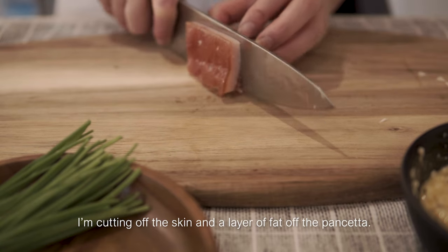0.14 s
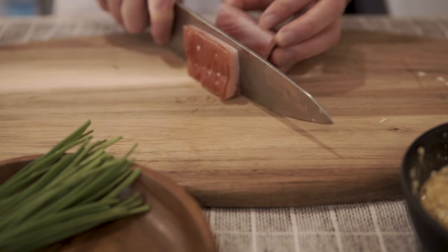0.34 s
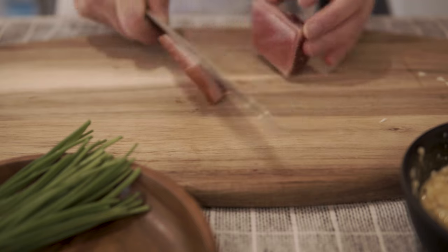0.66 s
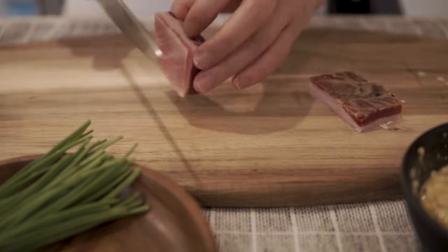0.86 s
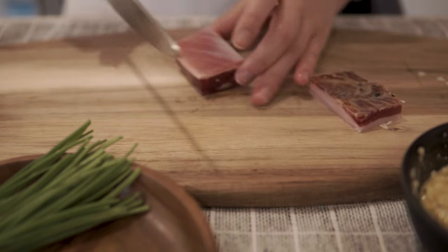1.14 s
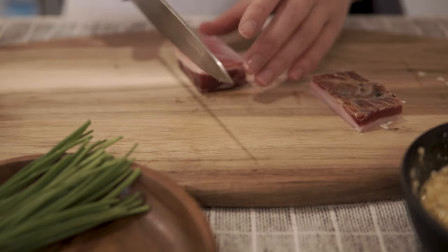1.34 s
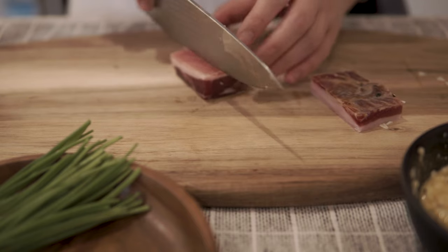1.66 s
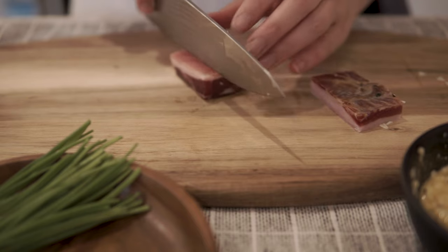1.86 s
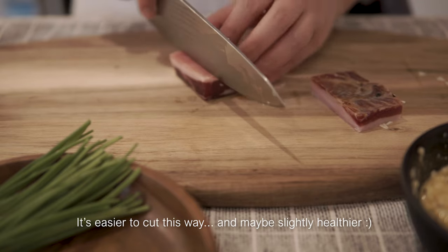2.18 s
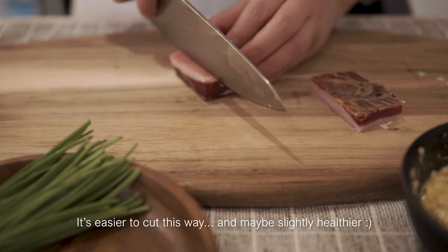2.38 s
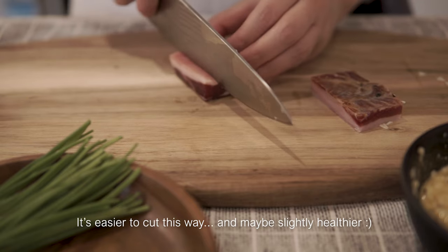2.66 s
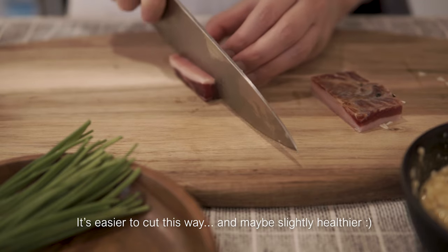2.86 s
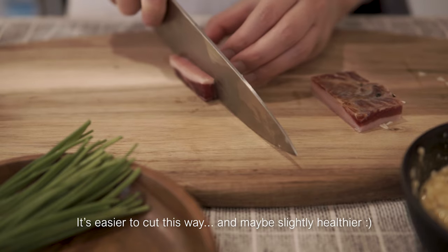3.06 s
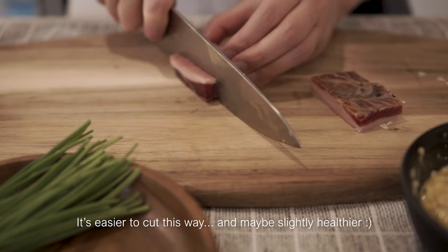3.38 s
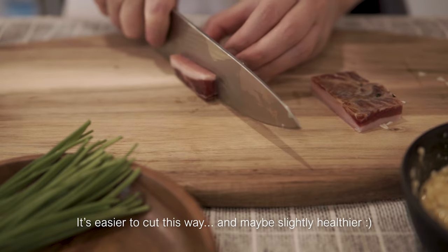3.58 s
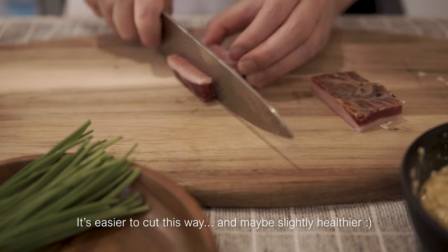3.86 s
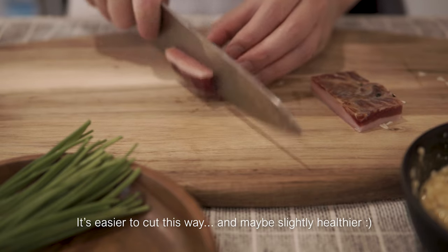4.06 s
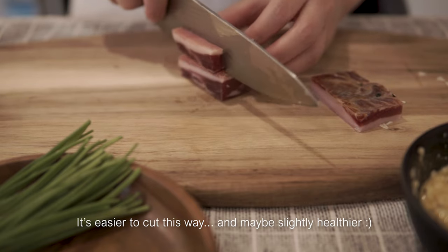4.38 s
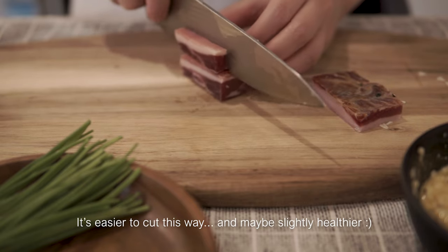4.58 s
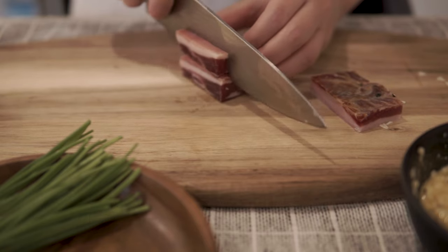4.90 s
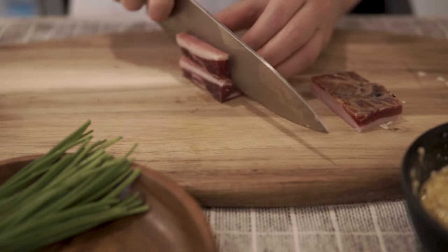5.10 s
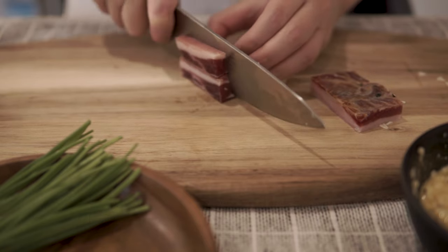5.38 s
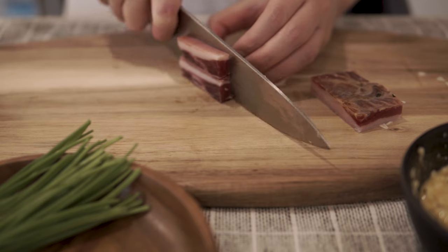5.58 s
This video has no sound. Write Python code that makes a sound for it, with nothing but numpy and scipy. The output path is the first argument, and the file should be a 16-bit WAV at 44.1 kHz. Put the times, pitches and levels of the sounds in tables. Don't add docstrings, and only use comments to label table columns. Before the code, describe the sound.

Close, dry sound of a knife on a thick wooden board in a small kitchen. Faint scrapes and ticks come first, then an abrupt scene change, a hollow slap of meat and a light chop. After a quiet gap, crunchy sawing with knocks and snaps builds to a hard ringing chop. Softer rasps follow, then another lull and a final burst of heavy chops and thumps over faint hiss.

```python
import sys
import numpy as np
from scipy import signal
from scipy.fft import rfft, irfft, next_fast_len
from scipy.io import wavfile

SR = 44100
rng = np.random.default_rng(int(sys.argv[2]) if len(sys.argv) > 2 else 0)


def gain_from_db(level_db):
    decades = np.asarray(level_db, float) / 20
    return 10 ** decades


def materialize(psi):
    bounded = np.clip(np.atleast_2d(psi).T, -1, 1)
    quanta = np.round(bounded * 32767).astype(np.int16)
    wavfile.write(sys.argv[1], SR, quanta)


N = 253134
SCENE_CHANGE_S = .761


def rms_one(x):
    return x / np.sqrt(np.mean(x ** 2) + 1e-20)


def at_hz(points, hz):
    table_hz, value = np.transpose(points)
    return np.interp(np.log(hz), np.log(table_hz), value)


def ring(force, hz, t60):
    r, w = gain_from_db(-60 / (t60 * SR)), 2 * np.pi * hz / SR
    return signal.lfilter([0, np.sin(w)], [1, -2 * r * np.cos(w), r * r], force + 1e-18)


def soften(x, cut_hz, kind="low", order=2):
    return signal.sosfilt(signal.butter(order, min(cut_hz, .45 * SR), kind, fs=SR, output="sos"), x)


def bandpass(x, low_hz, high_hz):
    return signal.sosfilt(signal.butter(2, [low_hz, high_hz], "band", fs=SR, output="sos"), x)


def coloured(spectrum):
    hz = np.maximum(np.fft.rfftfreq(N, 1 / SR), 1)
    return rms_one(irfft(rfft(rng.standard_normal(N)) * gain_from_db(at_hz(spectrum, hz)), N))


def swell(age, rise, fall):
    growing = np.sin(np.pi / 2 * np.clip(age / rise, 0, 1)) ** 2
    return np.where(age < rise, growing, np.exp((rise - age) / fall))


# f/Hz, level/dB [per Hz]
HISS_MID = [(75, -40), (110, -15), (150, -10.5), (180, -25), (210, -15), (330, -19), (480, -18.5),
            (700, -12.5), (1500, -18), (2600, -19.5), (10800, -22.5), (15500, -23.5), (16000, -29.5),
            (16600, -60.5)]
HISS_SIDE = [(12, -28), (20, -4), (94, -13.5), (194, -19), (271, -16), (349, -22.5), (563, -10.5),
             (1730, -13.5), (13400, -15.5), (16300, -21)]
HISS_DB, HISS_JUMP_DB, HISS_SETTLE_S = -72, 7.5, .25


def microphone_hiss():
    t = np.arange(N) / SR
    settling = np.exp(np.minimum(SCENE_CHANGE_S - t, 0) / HISS_SETTLE_S)
    level = gain_from_db(HISS_DB + HISS_JUMP_DB * (t >= SCENE_CHANGE_S) * settling)
    return level * coloured(HISS_MID), gain_from_db(-2) * level * coloured(HISS_SIDE)


# f/Hz, level/dB [rms]
HUM = [(24.2, -65.5), (48.4, -63.5), (72.6, -79), (96.8, -78), (145.2, -85.5)]
# t/s, f/Hz
WHINE = [(0, 12300), (.8, 12300), (.95, 11900), (1.05, 12250), (1.95, 12350), (2.06, 11800), (2.2, 12200),
         (2.45, 11800), (3.3, 12000), (3.85, 11950), (3.93, 11350), (4.15, 12000), (4.38, 12200),
         (4.45, 11700), (4.8, 12200), (4.9, 11850), (5.1, 12300), (5.74, 12050)]
WHINE_WANDER_HZ, WANDER_RATE_HZ = 70, 20


def machines():
    t = np.arange(N) / SR
    turn = 2 * np.pi * HUM[0][0] * t
    hum = sum(np.sqrt(2) * gain_from_db(db) * np.sin(2 * np.pi * hz * t + 6 * rng.random()) for hz, db in HUM)
    jitter = 110 * rms_one(soften(rng.standard_normal(N), 110))
    jitter += WHINE_WANDER_HZ * rms_one(soften(rng.standard_normal(N), WANDER_RATE_HZ))
    pitch = np.interp(t, *np.transpose(WHINE)) + jitter + 60 * np.sin(turn)
    whine = (1 + 0.42 * np.sin(turn)) * np.sin(2 * np.pi * np.cumsum(pitch) / SR)
    return hum + gain_from_db(-79) * whine


# f/Hz, t60/s
KITCHEN_T60 = [(150, 0.33), (500, 0.27), (1000, 0.2), (2500, 0.09), (6000, 0.15), (12000, 0.088)]
# f/Hz, level/dB
KITCHEN_LEVEL = [(150, 3), (600, 2.5), (1500, 2), (3000, 2.5), (6000, -16), (12000, -16.5)]


def walls_answer():
    t, out = np.arange(SR) / SR, 0
    white = rng.standard_normal((2, SR))
    edges = 120 * 2 ** np.arange(0, 7.1, .5)
    for k, (low, high) in enumerate(zip(edges, edges[1:])):
        band = bandpass(white[k % 2], low, high)
        hz = np.sqrt(low * high)
        out = out + band * gain_from_db(at_hz(KITCHEN_LEVEL, hz) - 60 * t / at_hz(KITCHEN_T60, hz))
    return out * (1 - np.exp(-(t / 0.0051) ** 2))


def kitchen(x, walls):
    size = next_fast_len(N + len(walls))
    return irfft(rfft(x, size) * rfft(walls, size), size)[:N]


# t/s, push level/dB, softness/s, pat level/dB
THUMPS = [(0.199, -37.5, 0.0044, -60), (.738, -53.5, 0.0034, -46.5), (1.022, -45.5, 0.0093, -43),
          (1.222, -42.5, 0.0085, -42.5), (1.702, -70, .005, -65.5), (2.522, -57.5, 0.011, -61),
          (2.571, -63, .01, -56), (2.656, -49, 0.0026, -45.5), (2.76, -26, 0.0063, -26.5),
          (2.84, -28, 0.008, -45.5), (2.97, -46.5, .006, -50.5), (3.11, -30, 0.007, -43.5),
          (3.401, -56, .004, -42.5), (4.948, -47, 0.011, -49.5), (5.156, -29, 0.011, -35),
          (5.22, -24.5, 0.015, -38.5), (5.309, -19, 0.021, -42), (5.624, -38.5, 0.0038, -37.5)]
# f/Hz, level/dB, t60/s
TABLE = [(80.4, 3.5, 0.37), (95, -12, 0.33), (145, -18, .15)]
# f/Hz, level/dB, t60/s
SLAB = [(156, -17, 0.12), (223.4, -4.5, 0.31), (270, -7.5, 0.033), (325, -3, 0.14)]


def table():
    push, pat = np.zeros((2, N))
    for s, push_db, soft, pat_db in THUMPS:
        shape, at = np.hanning(int(soft * SR) + 3), round(s * SR)
        push[at:at + len(shape)] += gain_from_db(push_db) * shape / shape.sum()
        pat[at] += gain_from_db(pat_db)
    push = gain_from_db(-50) * ring(push, 85, 0.092)
    legs = sum(gain_from_db(level_db) * ring(push, hz, t60) for hz, level_db, t60 in TABLE)
    slab = np.zeros(N)
    for k, (hz, level_db, t60) in enumerate(SLAB):
        slab += (-1) ** k * gain_from_db(level_db) * ring(pat, hz, t60)
    return soften(legs, 55, "high") + soften(soften(slab, 450), 130, "high")


# t/s, rise/s, fall/s, level/dB, centre f/Hz
SWISHES = [(.085, .03, .012, -41, 1300), (.085, .025, .015, -47, 2800), (.178, .017, .006, -39, 1500),
           (1.222, .006, .025, -47, 1700), (3.408, .025, .075, -36.5, 540), (3.41, .04, .07, -48, 2000),
           (.19, .015, .04, -58, 150), (3.885, .03, .025, -62, 1200), (5.7, .05, .02, -34, 1150),
           (.0, 0.038, 0.014, -66, 4250), (.33, 0.11, .04, -56, 5700), (1.09, 0.018, 0.032, -65.5, 4500),
           (2.30, .07, 0.041, -73, 6600), (2.86, .05, .05, -52, 3800), (2.655, .005, .02, -58, 8000),
           (3.41, 0.026, 0.068, -45, 2630), (3.405, .02, 0.027, -46.5, 3930),
           (3.501, 0.048, 0.004, -43.5, 4700), (3.719, 0.027, 0.031, -61.5, 6220),
           (4.945, .01, 0.25, -68, 2740), (4.94, .008, .02, -60, 5900), (5.22, 0.034, .02, -48.5, 8200),
           (5.40, .03, 0.022, -51, 6060)]
# f/Hz, width [ratio of edge to centre]
SWISH_WIDTH = [(160, 1.2), (550, 1.55), (1400, 1.22), (2700, 1.06), (3900, 1.18), (5000, 1.5), (8000, 1.3)]


def swishes():
    out, white = np.zeros(N), rng.standard_normal(N)
    for s, rise, fall, level_db, hz in SWISHES:
        width = max(at_hz(SWISH_WIDTH, hz), 1.03)
        span = slice(int(s * SR), int((s + rise + 7 * fall) * SR))
        noise = rms_one(bandpass(white[span], hz / width, hz * width))
        out[span] += gain_from_db(level_db) * swell(np.arange(len(noise)) / SR, rise, fall) * noise
    return out


# t/s, peak level/dB, f/Hz
SNAPS = [(4.886, -50, 5600), (.194, -30, 2700), (.115, -36, 1250), (1.2022, -47, 3750), (2.504, -53, 7790),
         (2.5516, -47, 7840), (2.6554, -41, 8200), (2.8362, -25.5, 7500), (2.8647, -41, 4404),
         (2.8898, -44, 3730), (3.106, -27, 3426), (3.1234, -36.5, 3792), (3.1461, -26, 4170),
         (3.2638, -18.5, 4850), (3.3226, -41, 6850), (3.3697, -27.5, 3660), (5.2972, -28.5, 4070),
         (5.3083, -22, 3600), (5.338, -16, 3640), (5.3774, -26.5, 6830), (5.4155, -35, 6870),
         (5.4556, -33.5, 6960), (5.462, -36, 5200), (5.5418, -42.5, 4980), (5.5483, -25.5, 5140),
         (5.5557, -31, 6690), (5.5782, -26, 3760), (5.585, -17, 5600), (5.6052, -25.5, 4230),
         (5.6826, -41, 6930)]


def snaps():
    out, size = np.zeros(N), 512
    puffs = rng.standard_normal((len(SNAPS), size)) * np.exp(-np.arange(size) / (0.0017 * SR))
    for (s, peak_db, hz), puff in zip(SNAPS, puffs):
        at = round(s * SR)
        out[at:at + size] += gain_from_db(peak_db + 4.5) * bandpass(puff, hz / 1.3, min(hz * 1.24, .45 * SR))
    return out


# peak t/s, rise/s, board level/dB, rasp over board/dB
BITES = [(.116, .024, -51, 8), (.15, .02, -63, 1), (.195, .022, -49, 4), (2.548, .06, -56, -11),
         (3.14, .024, -40, -9), (3.388, .02, -42.5, 1), (3.544, .028, -41, 1), (3.63, .045, -51, -7),
         (3.919, .04, -70, 2), (5.159, .016, -17, -7), (5.346, .05, -28, -6), (5.594, .09, -38, -10),
         (5.78, .078, -27, 3)]
# peak t/s, fall/s, board level/dB, rasp over board/dB
DRAGS = [(.005, .04, -62, 3), (.305, .022, -61, -9), (.227, .027, -60, -1), (.55, .09, -71.5, -7),
         (.708, .024, -68, -1), (1.008, .02, -51.5, -19), (1.201, .017, -55.5, -12), (1.527, .11, -72, .1),
         (2.658, .043, -69, 9), (2.745, .016, -38, -13), (2.757, .022, -23.5, -3), (2.825, .062, -45.5, -7),
         (2.912, .095, -42, -14), (2.963, .05, -43, 2), (3.045, .022, -49, -8), (3.155, .075, -38.5, -3.5),
         (3.255, .027, -37.5, -4), (3.397, .008, -35, 4), (3.44, .06, -41, -17), (4.941, .055, -54, -12),
         (5.18, .03, -36, -5), (5.24, .05, -36, -9), (5.402, .058, -47, -4)]
BITE_FALL_PER_RISE, DRAG_RISE_PER_FALL = .55, .3
RUB_CLACK_DB, RUB_CLACK_PER_BRIGHTNESS = 2.2, .7


def strokes():
    rows = [(s, rise, BITE_FALL_PER_RISE * rise, db, bright) for s, rise, db, bright in BITES]
    rows += [(s, DRAG_RISE_PER_FALL * fall, fall, db, bright) for s, fall, db, bright in DRAGS]
    out = []
    for peak_s, rise, fall, board_db, bright in rows:
        clack_db = board_db + RUB_CLACK_DB + RUB_CLACK_PER_BRIGHTNESS * bright
        out.append((max(peak_s - rise, 0), rise, fall, board_db, clack_db, board_db + bright))
    return out


def crunches():
    t, rubs = np.arange(N) / SR, np.zeros((3, N))
    sizes = gain_from_db(4.4 * np.minimum(rng.exponential(1, N), 4)) * rng.choice([-1, 1], N)
    grains = rms_one(sizes * (rng.random(N) < 1000. / SR))
    smooth = rng.standard_normal((3, N))
    for s, rise, fall, *levels_db in strokes():
        span = slice(int(s * SR), int((s + rise + 7 * fall) * SR))
        grit = np.clip((levels_db[0] + 62) / 40, 0, .75)
        mix = np.sqrt(grit) * grains[span] + np.sqrt(1 - grit) * smooth[:, span]
        rubs[:, span] += gain_from_db(np.array(levels_db))[:, None] * swell(t[span] - s, rise, fall) * mix
    return rubs


# t/s, knock level/dB, hollow ring over knock/dB, crack over knock/dB
KNOCKS = [(0.194, -37, -25, -3), (2.751, -21, -18, -4), (2.754, -27, 2, 6), (2.763, -21, 0, -15),
          (2.943, -23, -15, -2), (2.968, -28.5, -13, 5), (2.984, -37.5, -6, 4), (3.007, -30, -18, 3),
          (3.162, -25.5, -15, -2), (3.178, -30, -6, 0.1), (3.19, -37.5, -6, 2), (3.219, -25.5, -13, -7),
          (3.263, -27, -13, -12), (3.274, -24, -14, 3), (3.378, -31.5, -5, -4), (4.886, -53, -7, -3),
          (4.946, -34.5, -2, -17), (5.151, -21, -25, -2), (5.156, -15, -26, -1), (5.328, -23.5, -25, -5),
          (5.355, -20.5, -28, 3)]
# t/s, knock level/dB, ring, crack and clack over knock/dB
CHOPS = [
    (1.218, -20, -12, -15, -3),
    (3.402, -9.5, -8, -9, -12),
    (5.215, -9, -19, -15, -3),
    (5.622, -10.5, -18, -18, -4),
]
# t/s, ring level/dB, knock over ring/dB
DROPS = [
    (0.739, -35.5, -16),
    (1.007, -29, -20),
    (1.019, -22, -7),
    (1.032, -36.5, -15),
    (1.049, -37.5, -15),
    (1.241, -25, -2.5),
]
CLACK_DB, CLACK_PER_HARDNESS = -3.5, .2
DROP_CLACK_DB, DROP_CRACK_DB = -23, -29


def strikes():
    rows = []
    for s, db, ring_db, hard in KNOCKS:
        rows.append((s, db, db + ring_db, db + CLACK_DB + CLACK_PER_HARDNESS * hard, db + hard))
    for s, db, ring_db, hard, clack_db in CHOPS:
        rows.append((s, db, db + ring_db, db + clack_db, db + hard))
    for s, db, knock_db in DROPS:
        rows.append((s, db + knock_db, db, db + DROP_CLACK_DB, db + DROP_CRACK_DB))
    return np.transpose(rows)


STRIKE_SPREAD_DB = 2.0


def body(modes, rub, at, strike_db, dull_db=0):
    out = np.zeros(N)
    luck = np.clip(rng.standard_normal((len(at), len(modes))), -1.5, 1.5)
    for k, (hz, level_db, t60) in enumerate(modes):
        force = rub.copy()
        octaves = np.log2(hz / modes[0][0])
        force[at] += gain_from_db(strike_db + STRIKE_SPREAD_DB * luck[:, k] - dull_db * octaves)
        out += (-1) ** k * gain_from_db(level_db) * ring(force, hz, t60)
    return out


BOARD = [(800, 0, .013), (1150, -18, .02), (1010, -17, .025)]
HOLLOW = [(310, -11, .07), (375, -15, .06), (455, -10, .06), (545, -8, .06), (645, 0, .04), (600, -13, .09),
          (710, -10, .04)]
CLACK = [(1200, -9, .012), (1380, -5, .014), (1580, 0, .013), (1900, -11, .012)]
BLADE = [(2590, -2, 0.011), (3030, -5.5, 0.0085), (3707, -3.5, 0.0078), (4270, -5.5, 0.0065),
         (5080, -5.5, 0.0065), (5630, -6, 0.0061), (6915, -4.5, 0.0044), (7840, -11, 0.0076),
         (9146, -10, 0.0034)]


def cutting():
    board_rub, clack_rub, rasp = crunches()
    s, knock_db, hollow_db, clack_db, crack_db = strikes()
    at = np.round(s * SR).astype(int)
    knock = body(BOARD, gain_from_db(-13) * board_rub, at, knock_db + 8)
    hollow = body(HOLLOW, gain_from_db(-25.5) * board_rub, at, hollow_db + 3.0)
    clack = body(CLACK, gain_from_db(-19) * clack_rub, at, clack_db + 3)
    bluntness_db = np.clip(0.26 * (knock_db - crack_db), 0, 9)
    steel = body(BLADE, gain_from_db(-15.5) * rasp, at, crack_db + 1.5, dull_db=bluntness_db)
    wood = soften(soften(knock, 450, "high") + soften(hollow, 420, "high"), 1400)
    clack = soften(soften(clack, 790, "high"), 2600)
    return wood + clack + soften(steel + gain_from_db(-5.5) * rasp, 2050, "high", order=3)


def scene():
    t = np.arange(N) / SR
    before = t < SCENE_CHANGE_S
    near = soften(cutting() + snaps() + swishes(), 9800, order=5)
    near = (near + table()) * (before | (t > SCENE_CHANGE_S + .15))
    walls = walls_answer()
    wet = before * kitchen(near * before, walls) + kitchen(near * ~before, walls)
    hiss_mid, hiss_side = microphone_hiss()
    mid = near + gain_from_db(-39.5) * wet + machines() + hiss_mid
    side = hiss_side + gain_from_db(-21.5) * soften(np.roll(near, 40), 4000, "high")
    side += gain_from_db(-59) * np.roll(near, 90)
    return np.array([mid + side, mid - side])


def band_limit(x):
    return signal.sosfilt(signal.butter(12, 15900, fs=SR, output="sos"), x)


def record(dry):
    return band_limit(dry)


dry = scene()
out = record(dry)
materialize(out)
```